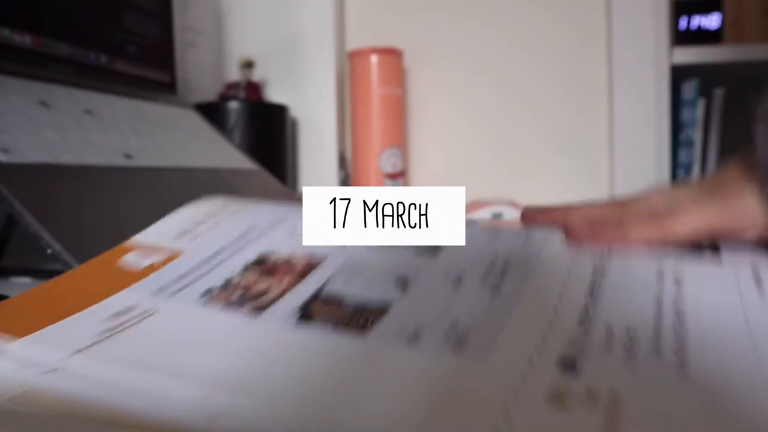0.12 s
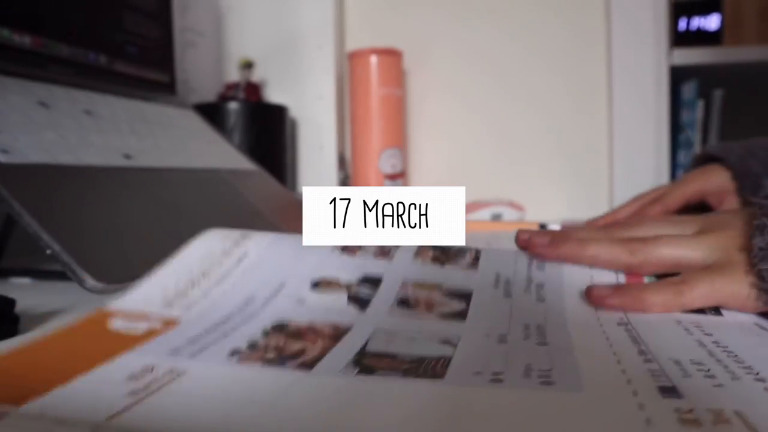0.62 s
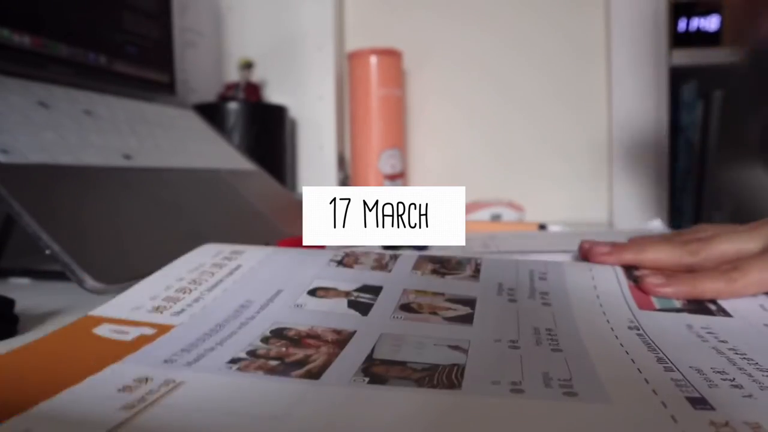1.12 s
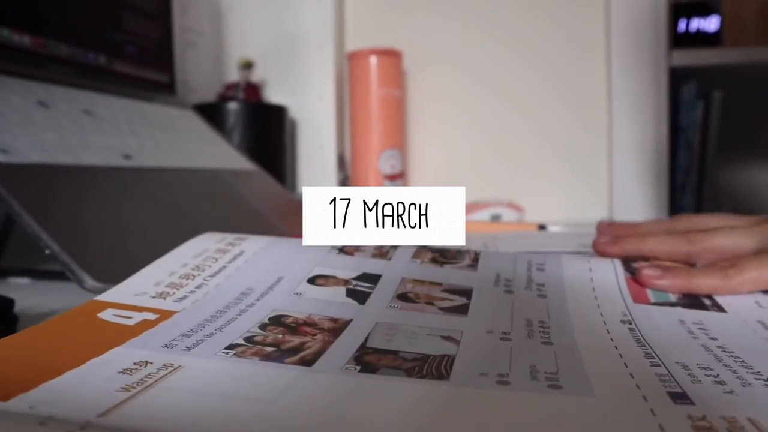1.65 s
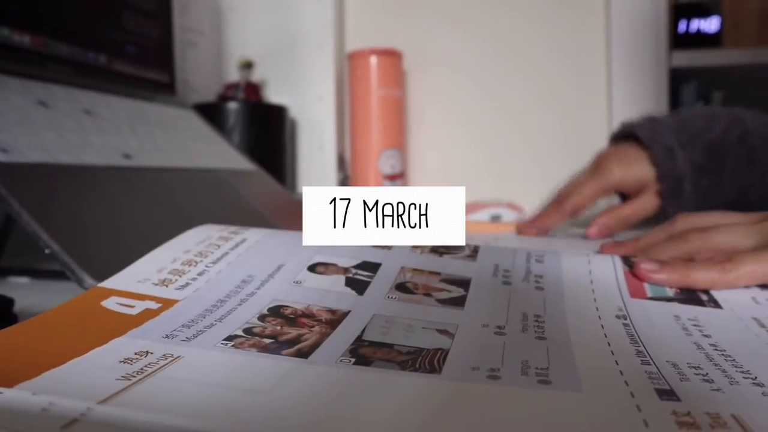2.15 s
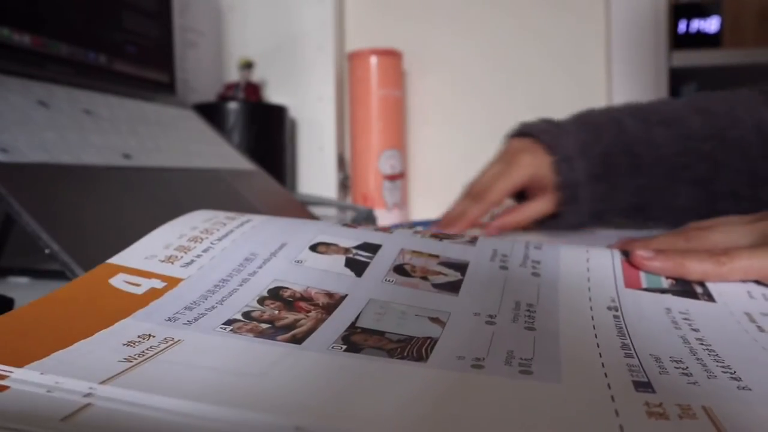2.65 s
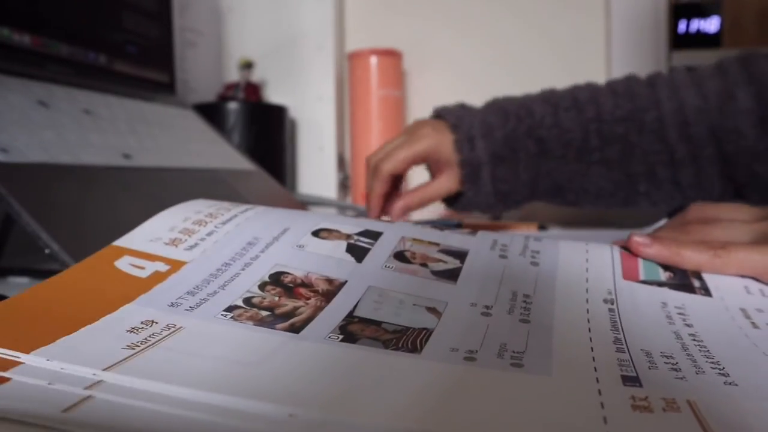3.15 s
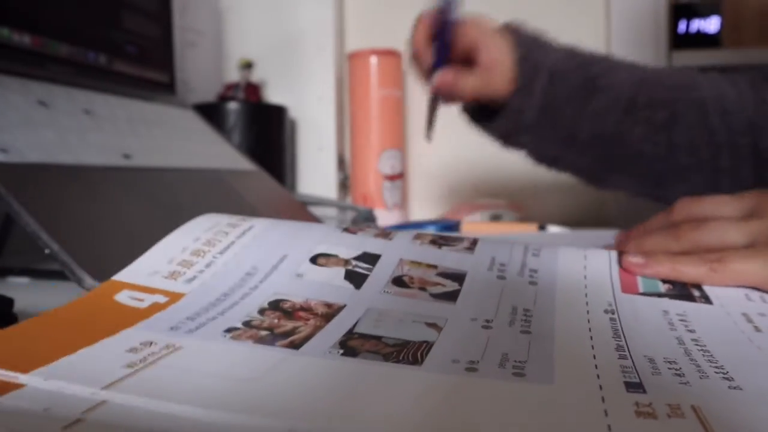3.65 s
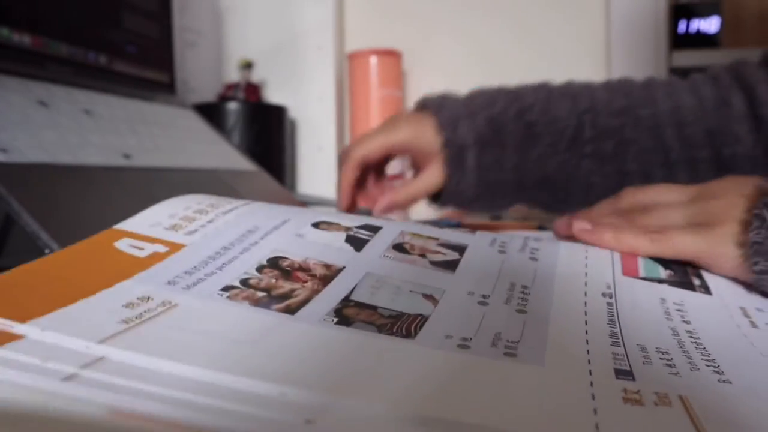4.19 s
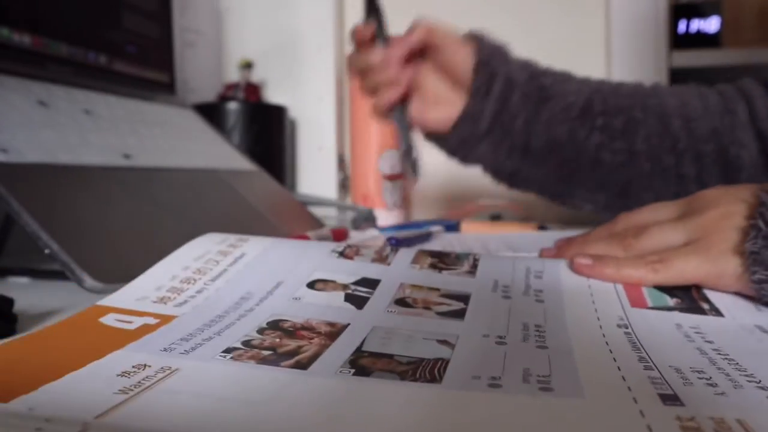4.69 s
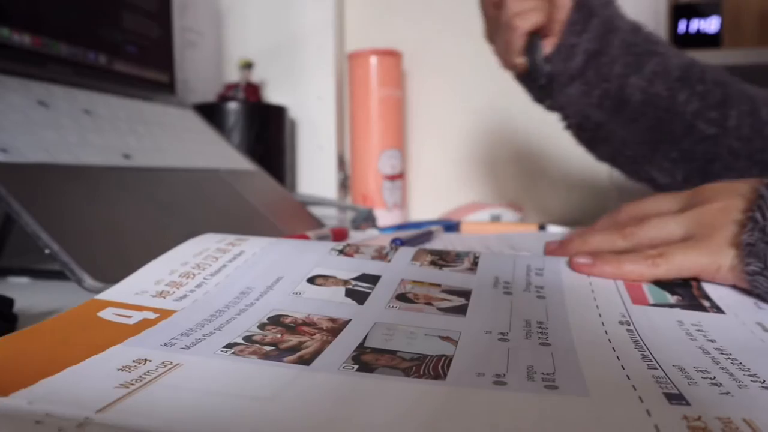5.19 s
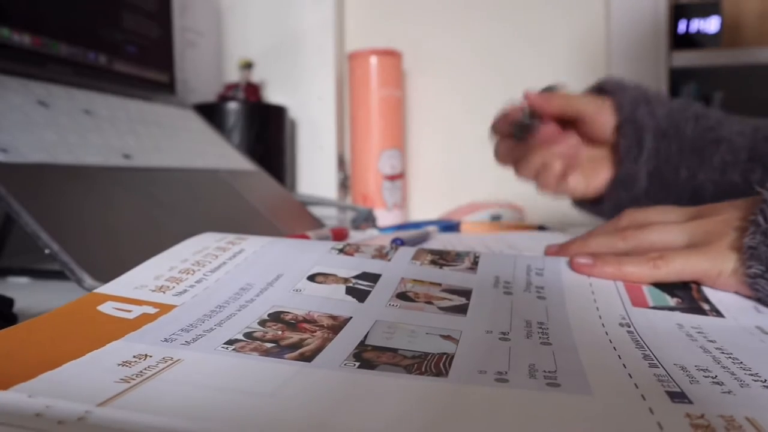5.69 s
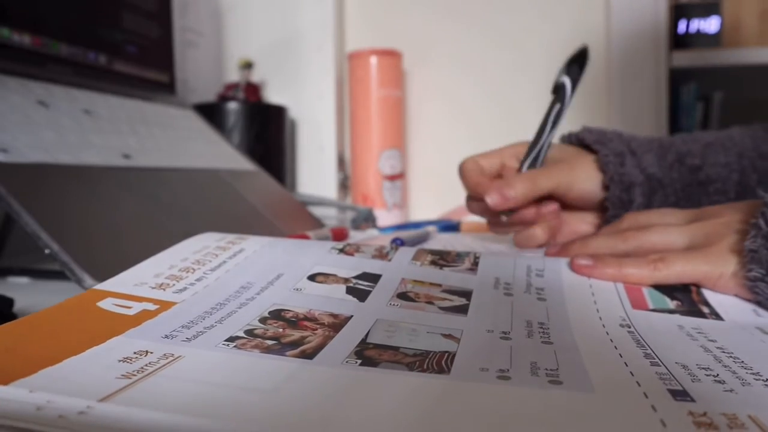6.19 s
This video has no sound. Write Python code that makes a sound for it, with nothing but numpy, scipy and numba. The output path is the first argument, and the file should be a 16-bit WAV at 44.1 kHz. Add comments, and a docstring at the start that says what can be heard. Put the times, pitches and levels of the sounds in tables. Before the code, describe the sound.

Dry paper sliding for about a second, with a snap of the book, then near quiet with one more pop. Fingers rustle through pens on a desk, making tiny plastic rattles and dull knocks; one pen lands in a quick cluster of taps. Later a pen mechanism clicks crisply several times. Close, intimate pickup, low hiss, short indoor reflections.

```python
"""A hand drags over the pages of an open book, then sorts through pens, drops one and clicks another.
Noise grains through moving resonances make the rub; soft pushes ring the book's and the desk's modes.
Pen ticks ring barrel, plunger and clip, each with a short rattle. A small quiet room answers,
and two close microphone ports add their own steady hiss."""
import sys
import numpy as np
from scipy import signal
from scipy.fft import rfft, irfft
from scipy.io import wavfile
from scipy.ndimage import uniform_filter1d
from numba import njit

SR = 44100
rng = np.random.default_rng(int(sys.argv[2]) if len(sys.argv) > 2 else 0)


def inscribe(sig):
    """Save sig as 16-bit PCM at rate SR to the path in sys.argv[1].

    A 1-D sig is mono; a 2-D sig holds one channel per row.
    Samples are clipped to [-1, 1] before scaling.
    """
    pcm = np.round(np.clip(np.atleast_2d(sig).T, -1, 1) * 32767)
    wavfile.write(sys.argv[1], SR, pcm.astype(np.int16))


def attenuation_scalar(level_db):
    """Turn a level in dB into a linear amplitude multiplier (20 dB per decade)."""
    decades = np.asarray(level_db, float) / 20
    return 10 ** decades


N = 278756

# Two long slides of hand and sleeve, over the page and then among the pens; rms levels before sway:
# start_s, sheet_db, fine_grain_db, desk_db
SLIDES = [
    [(0.0, -63, -67, -58), (0.03, -51.5, -67, -70), (0.08, -47.5, -56.5, -58), (0.154, -50.5, -64.5, -48.5),
     (0.2, -53.5, -74, -69), (0.222, -52, -72, -55), (0.253, -39.5, -63, -53), (0.293, -55.5, -72, -61),
     (0.333, -50.5, -65.5, -61), (0.5, -52.5, -67, -60), (0.558, -49.5, -65, -69), (0.634, -53, -66, -41.5),
     (0.674, -46.5, -55, -55), (0.862, -50.5, -64, -64), (0.89, -52, -65, -37), (0.93, -80, -85, -56)],
    [(2.06, -82, -81, -63), (2.12, -58, -65, -57), (2.186, -53.5, -57, -57), (2.31, -50, -48, -56),
     (2.336, -59, -56, -61), (2.368, -55.5, -60, -51), (2.43, -49.5, -49, -54),
     (2.542, -51.5, -50.5, -47.5), (2.58, -42, -50, -50), (2.64, -50, -53, -51), (2.7, -54, -57.5, -49),
     (2.8, -53, -63, -50.5), (2.918, -52, -65, -53), (2.946, -65, -71, -65), (2.97, -52.5, -59, -51.5),
     (3.05, -73, -68, -50)],
]
# Short brushes of fingers on paper and desk; rms levels at the crest, before sway:
# crest_s, length_s, sheet_db, fine_grain_db, desk_db
BRUSHES = [(1.25, .04, -59, -80, -67), (1.454, 0.077, -60, -85, -54), (1.564, .06, -59, -75, -56),
           (1.705, 0.12, -60, -72, -56), (2.037, 0.031, -68, -64, -47), (3.141, 0.032, -44, -73, -55),
           (3.196, 0.076, -65, -64, -46), (3.26, 0.075, -43.5, -52, -49.5), (3.339, .12, -56, -63.5, -48.5),
           (3.41, 0.023, -51, -61, -67), (3.536, 0.16, -56.5, -68, -58), (3.722, 0.17, -54, -68, -71),
           (3.946, 0.3, -56, -84, -53.5), (4.03, 0.11, -60, -57, -47), (4.16, 0.046, -68, -66, -62),
           (4.222, 0.072, -68, -69, -42.5), (4.299, 0.09, -51.5, -66, -47), (4.376, 0.14, -53.5, -80, -55),
           (4.55, 0.15, -60, -59.5, -68)]
BRUSH_RISE_SHARE, BRUSH_EDGE_DB = 0.49, -12.5  # share of the length before the crest; both ends re crest

# Rubbed resonances of paper fibres, page stack and desk board: centre_hz, width_hz (each pass), relative_db
FIBRE_BANDS = [(4970, 9900, 6.5), (9740, 4100, 1)]
PAGE_BANDS = [(537, 1050, -3), (885, 1000, 0)]
BOARD_BANDS = [(136, 214, 3.5), (240, 59, -6)]
SHEET_WIDTH_HZ = 2000  # each pass
SHEET_HZ, SHEET_HZ_PER_DB, SHEET_REF_DB = 2160, 13, -50.5  # a brisker drag sounds a little higher
PAGES_DB, PAGES_PER_DB = -53, 0.98  # the page stack follows the sheet
# Slow unevenness, before slewing: sheet_db, fine_grain_db, page_stack_db, desk_db
SWAY_DB = (1.3, 3, 2.3, 2.7)
SWAY_S = 0.04

# Steady hiss common to both ports, and opposed between them: frequency_hz, relative_density_db
HUSH = [(15, -29), (25, 4.5), (53, -3.5), (98, -5.5), (271, -8), (326, -9), (373, -9.5), (450, -10),
        (1000, -14.5), (1090, -15), (1960, -17), (11200, -34.5), (15000, -46)]
HUSH_SIDE = [(15, -78), (25, -29), (86, -13), (196, -4.5), (250, -6.5), (318, -3.5), (383, -6.5),
             (543, -5.5), (769, -8), (952, -8.5), (3440, -16), (10900, -29), (15000, -36)]
HUSH_DB, HUSH_SIDE_DB = -53.5, -51.5  # rms

# Binding and stacked pages pop; peaks before the book's bass cut:
# start_s, peak_db, contact_ms, ring_share (of the free ring time)
POPS = [(0.144, -32.5, 0.68, 1), (0.742, -33, 0.54, 1), (0.891, -37, 0.6, 0.62), (0.898, -33, 0.35, 0.62),
        (0.912, -43, 0.88, 0.32), (0.918, -12.5, 0.13, 0.76), (1.2703, -14.5, 0.35, 0.99),
        (2.606, -32.5, 0.22, 1), (2.734, -34.5, 0.51, 0.63), (2.916, -32.5, 0.14, 0.91),
        (3.138, -28.5, 0.44, 0.41), (3.968, -19, 0.6, 0.3), (3.977, -26, 0.44, 0.52),
        (3.985, -32, 0.4, 0.54), (3.9945, -27.5, 0.37, 0.37), (4.002, -32, 0.36, 0.6),
        (4.009, -28, 0.33, 1), (4.201, -35, 0.2, 0.58), (4.291, -21.5, 0.84, 0.89),
        (4.9415, -31, 0.091, 0.26)]
# Modes of the book: pitch_hz, relative_db, free_t60_s
BOOK_MODES = [(401, 4, 0.021), (483, -7.5, 0.12), (730, 9.5, 0.025), (1025, -4, 0.042), (1250, -2, 0.018),
              (1520, 5, 0.019), (1920, 0.5, 0.028), (2500, -5.5, 0.014), (2810, -10.5, 0.041),
              (3200, -5.5, 0.01), (4200, -27, .01)]
BOOK_BASS_HZ = 260
# Fingers and pens land on the desk top: start_s, peak_db, contact_ms, ring_share (of the free ring time)
THUMPS = [(0.176, -42.5, 0.97, 0.59), (0.59, -30, 0.31, 0.21), (0.635, -40.5, 0.92, 0.67),
          (1.642, -36.5, 5.8, 0.79), (2.112, -42, 5.5, 0.45), (2.579, -28.5, 5, 0.85),
          (2.611, -38.5, 1.2, 0.8), (3.14, -30, 0.55, 0.9), (3.968, -25.5, 1.15, 1),
          (3.994, -21, 1.5, 0.85), (4.019, -27.5, 1.7, 0.67), (4.04, -40, 0.87, 0.7),
          (4.195, -33.5, 0.64, 0.61)]
# Modes of the desk top: pitch_hz, relative_db, free_t60_s
DESK_MODES = [(93, -8.5, 0.032), (138, -6.5, 0.17), (161.5, -4.5, 0.12), (242, 0, 0.067),
              (346, -6.5, 0.094), (459, -2.5, 0.056)]

# Plastic pens tick and click; part levels are peaks, the rattle is relative to the first contact:
# start_s, plunger_db, barrel_db, clip_db, rattle_db
TICKS = [(1.567, -50, -45, -58, -11), (1.644, -42, -37, -75, -17), (2.5829, -43, -29, -23, -8),
         (2.5891, -50, -41, -24, -12), (2.6118, -34, -46, -34, -8), (2.735, -37, -35, -40, -4),
         (2.977, -50, -39, -27, -15), (3.131, -38, -45, -43, -12), (3.1388, -30, -39, -28, 3),
         (3.1422, -30, -34, -33, -15), (3.1485, -29.5, -57, -27.5, -16), (3.2606, -23, -59, -17.5, -20),
         (3.2654, -29, -35, -25, -6), (3.2746, -29, -54, -28, 2), (3.2894, -41, -55, -39, -9),
         (3.4154, -43, -63, -61, -9), (3.9705, -39, -27.5, -21.5, 7), (3.9744, -33, -61, -20, 3),
         (4.0158, -33.5, -38.5, -37, 4), (4.2017, -39, -49, -36, -12.5), (4.367, -45.5, -58, -76, -15),
         (4.5455, -30.5, -35.5, -29.5, -26.5), (4.8458, -26.5, -67, -33, -15.5),
         (4.8958, -34.5, -61, -41, -14), (4.904, -36.5, -46, -41, -11), (4.9405, -18, -24, -12.5, -16),
         (5.086, -25, -49, -29, -12), (5.1064, -11.5, -24, -9.5, -18)]
# Modes of each pen part: pitch_hz, relative_db, t60_s
BARREL_MODES = [(1070, -12, 0.0015), (1570, -2, 0.0073), (1840, 4.5, 0.0068), (2240, 10, 0.0041),
                (2560, 4, 0.008)]
PLUNGER_MODES = [(2780, -4, 0.0022), (3490, 16, 0.003), (4100, -41, 0.0026), (4300, 5.5, 0.0063),
                 (4900, -8, 0.0024), (5370, -5.5, 0.01)]
CLIP_MODES = [(6870, 4, 0.0025), (7320, -3, 0.011), (9430, 6, 0.0038), (9600, 1.5, 0.0034),
              (10400, 10.5, 0.0028), (12500, 2.5, 0.0035), (11660, 7, 0.0015), (13800, -33, 0.0038)]
RATTLE_S = 0.0031  # time to fall to 1/e

WALL_ECHO_S, WALL_SMEAR_S, WALL_ECHO_DB = 0.0093, 0.001, -13.5
ROOM_T60_S, ROOM_TREBLE_T60_S, ROOM_DB = 0.26, 0.18, -13


def level(x, db):
    """Scale to an rms level."""
    return x * attenuation_scalar(db) / np.sqrt(np.mean(x ** 2))


def wobble(size):
    """Random levels held for some samples and slewed."""
    held = np.repeat(rng.standard_normal(N // size + 1), size)[:N]
    return uniform_filter1d(held, size)


@njit
def svf(x, hz, width):
    """State-variable band-pass whose centre can move."""
    y, b, l = np.empty(len(x)), 0., 0.
    for i in range(len(x)):
        g, k = np.tan(np.pi * hz[i] / SR), width / hz[i]
        v = (b + g * (x[i] - l)) / (1 + g * (g + k))
        b, l, y[i] = 2 * v - b, l + 2 * g * v, k * v
    return y


def resonance(x, hz, width):
    """A fixed or moving resonance applied twice, for steep skirts."""
    hz = hz + np.zeros(N)
    once = svf(x, hz, 1. * width)
    return svf(once, hz, 1. * width)


def drag_db():
    """Levels of sheet, grain and desk: the slides, and brushes that swell to a crest and fade."""
    t = np.arange(0, N / SR, .001)
    power = np.array(1e-12)
    for slide in SLIDES:
        s, *columns = np.transpose(slide)
        touching = (t >= s[0]) * (t < s[-1])
        power = power + [attenuation_scalar(2 * np.interp(t, s, db)) * touching for db in columns]
    for crest, length, *dbs in BRUSHES:
        before, after = (crest - t) / BRUSH_RISE_SHARE, (t - crest) / (1 - BRUSH_RISE_SHARE)
        away = np.maximum(before, after) / length
        power = power + attenuation_scalar(2 * np.array(dbs))[:, None] * attenuation_scalar(2 * BRUSH_EDGE_DB * away)
    return [np.interp(np.arange(N) / SR, t, db) for db in 10 * np.log10(power)]


def rub():
    """Dense stick-slip grains of uneven size shake the sheet, its fibres, the page stack and the board."""
    sheet_db, grain_db, desk_db = drag_db()
    brisk = sheet_db - SHEET_REF_DB
    sheet_bands = [(SHEET_HZ + SHEET_HZ_PER_DB * brisk, SHEET_WIDTH_HZ, 0)]
    shapes = sheet_bands, FIBRE_BANDS, PAGE_BANDS, BOARD_BANDS
    levels = sheet_db, grain_db, PAGES_DB + PAGES_PER_DB * brisk, desk_db
    out = 0
    for shape, db, sway_db in zip(shapes, levels, SWAY_DB):
        slips = rng.standard_normal(N) * attenuation_scalar(2 * rng.exponential(size=N))
        # a quick flutter of about 9 ms over the slow sway
        uneven_db = 1.7 * wobble(400) + sway_db * wobble(int(SWAY_S * SR))
        layer = sum(attenuation_scalar(gain_db) * resonance(slips, hz, width) for hz, width, gain_db in shape)
        out = out + level(layer, 0) * attenuation_scalar(db + uneven_db)
    return out


def hiss(points, db):
    """Steady port noise: random samples shaped to a given spectrum."""
    hz, gain_db = np.transpose(points)
    log_hz = np.log(np.fft.rfftfreq(N, 1 / SR) + 1)
    spectrum = rfft(rng.standard_normal(N)) * attenuation_scalar(np.interp(log_hz, np.log(hz), gain_db))
    return level(irfft(spectrum, N), db)


def ring(modes, scatter_db, detune, size=8192):
    """Decaying modes of alternate sign; every blow lands elsewhere, so weights and pitches shift a little."""
    hz, db, t60 = np.transpose(modes)[:, :, None]
    chance = rng.standard_normal((2, len(modes), 1))
    t = np.arange(size) / SR
    sign = (-1) ** np.arange(len(modes))[:, None]
    weight = sign * attenuation_scalar(db + scatter_db * chance[0])
    decay = np.exp(-np.log(1000) * t / t60)
    swing = np.sin(2 * np.pi * hz * (1 + detune * chance[1]) * t)
    return np.sum(weight * decay * swing, axis=0)


def add(out, s, sound, db):
    """Place a sound with its peak at a level."""
    i = int(s * SR)
    sound = sound[:N - i]
    out[i:i + len(sound)] += attenuation_scalar(db) * sound / np.max(np.abs(sound))


def blows(events, modes, scatter_db):
    """A smooth push rings the modes; a softer contact is longer and duller, a resting hand damps the ring."""
    out = np.zeros(N)
    for s, db, contact_ms, ring_share in events:
        progress = np.clip(np.arange(300) / SR / (contact_ms / 1000), 0, 1)
        push = np.sin(np.pi * progress) ** 2
        damped = np.array(modes) * [1, 1, ring_share]
        add(out, s, signal.fftconvolve(ring(damped, scatter_db, .01), push), db)
    return out


def book_pops():
    """Binding and pages pop in the book's modes; the deep bass below them is cut away."""
    bass_cut = signal.butter(2, BOOK_BASS_HZ, "high", fs=SR)
    return signal.lfilter(*bass_cut, blows(POPS, BOOK_MODES, 1.0))


def desk_thumps():
    """Fingers and pens land on the desk top and push its low modes."""
    return blows(THUMPS, DESK_MODES, 0.68)


def pens():
    """Each tick is a sharp contact and a dying rattle, weaker or stronger than it, into barrel, plunger, clip."""
    near, spread = np.zeros(N), np.zeros(N)
    t = np.arange(2048) / SR
    for s, plunger_db, barrel_db, clip_db, rattle_db in TICKS:
        rattle = attenuation_scalar(rattle_db) * rng.standard_normal(len(t)) * np.exp(-t / RATTLE_S)
        rattle[0] = 1  # the first contact
        parts = (BARREL_MODES, barrel_db), (PLUNGER_MODES, plunger_db), (CLIP_MODES, clip_db)
        for modes, db in parts:
            sound = ring(modes, 1, .015, size=1024)
            add(near, s, signal.fftconvolve(sound, rattle), db)
            # summed over all directions the rattle's colour evens out: the walls get the plain modes
            add(spread, s, sound, db)
    return near, spread


def room(x):
    """One near wall, and a diffuse tail, shorter in the treble, that differs at the ports except in the bass."""
    t = np.arange(int(.4 * SR)) / SR
    noise = rng.standard_normal((2, len(t)))
    low = signal.lfilter(*signal.butter(1, 5000, fs=SR), noise)
    tail = low * 1000 ** (-t / ROOM_T60_S) + (noise - low) * 1000 ** (-t / ROOM_TREBLE_T60_S)
    tail = tail * np.clip(t / 0.001, 0, 1)
    # row 0 is common to both ports, row 1 opposed between them
    tail[1] = signal.lfilter(*signal.butter(1, 900, "high", fs=SR), tail[1])
    tail = attenuation_scalar(ROOM_DB) * tail / np.sqrt(np.sum(tail[0] ** 2))
    # an uneven wall smears its echo over a millisecond or two
    smear = rng.standard_normal(len(t)) * np.exp(-((t - WALL_ECHO_S) / WALL_SMEAR_S) ** 2)
    tail[0] += attenuation_scalar(WALL_ECHO_DB) * smear / np.sqrt(np.sum(smear ** 2))
    return signal.fftconvolve(x[None], tail, axes=1)[:, :N]


def scene():
    """All sources near the middle; the port spacing turns their treble into a left-right difference."""
    paper = rub() + book_pops() + desk_thumps()
    ticks, spread = pens()
    near = paper + ticks
    room_mid, room_side = room(paper + attenuation_scalar(7.0) * spread)
    # one port hears the sound just before the other
    spaced = np.gradient(near)
    mid = near + room_mid + hiss(HUSH, HUSH_DB)
    side = spaced + room_side + hiss(HUSH_SIDE, HUSH_SIDE_DB)
    return np.array([mid + side, mid - side])


def low_pass(x):
    """Removes everything above the highest recorded frequency."""
    return signal.sosfilt(signal.butter(12, 16500, fs=SR, output="sos"), x)


def record(dry):
    """The microphones lose the deepest bass and the top."""
    no_rumble = signal.sosfilt(signal.butter(3, 38, "high", fs=SR, output="sos"), dry)
    mix = signal.sosfilt(signal.butter(8, 13800, fs=SR, output="sos"), no_rumble)
    return low_pass(mix)


dry = scene()
out = record(dry)
inscribe(out)
```